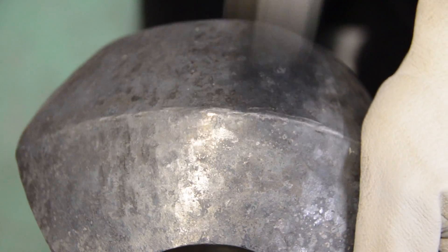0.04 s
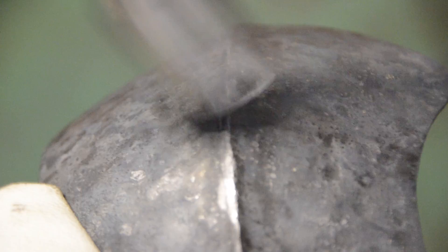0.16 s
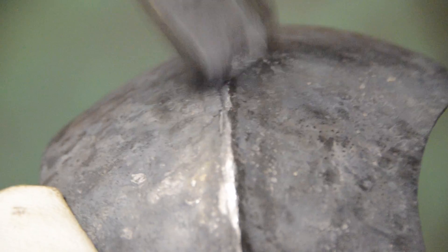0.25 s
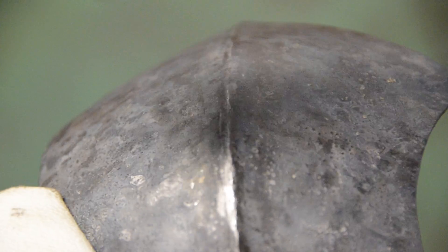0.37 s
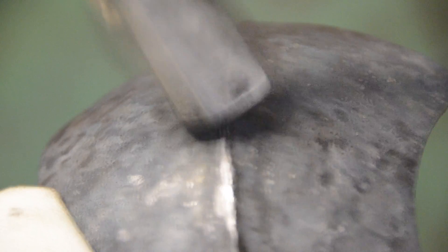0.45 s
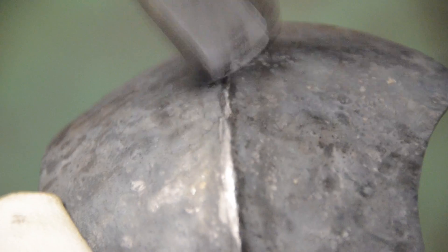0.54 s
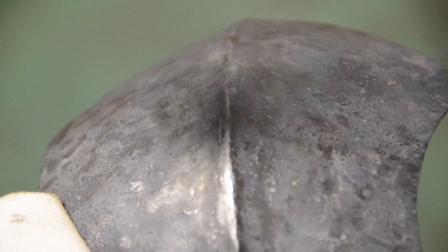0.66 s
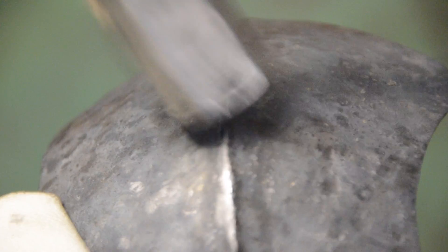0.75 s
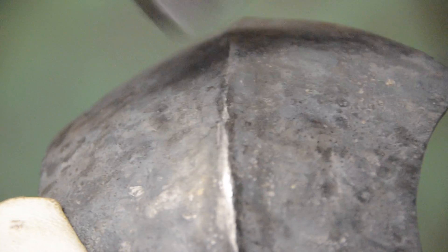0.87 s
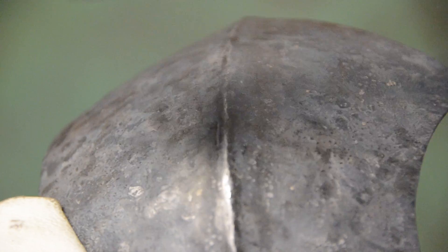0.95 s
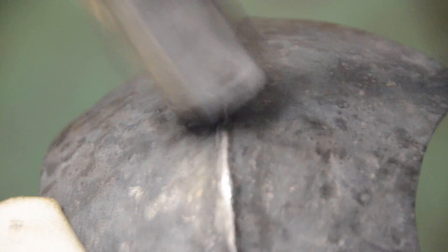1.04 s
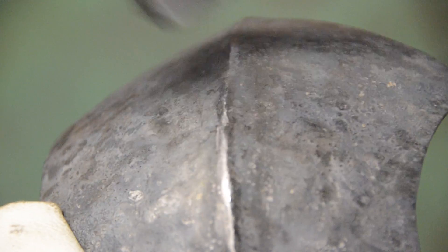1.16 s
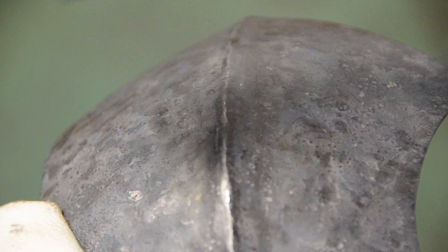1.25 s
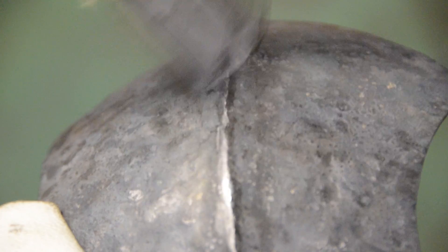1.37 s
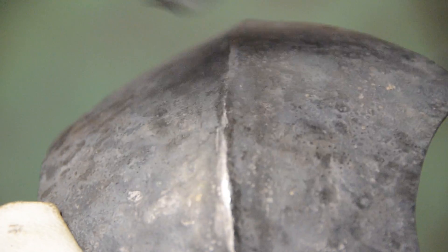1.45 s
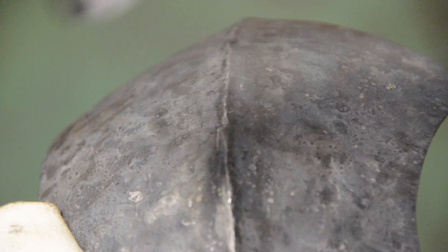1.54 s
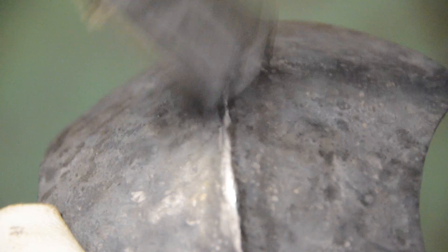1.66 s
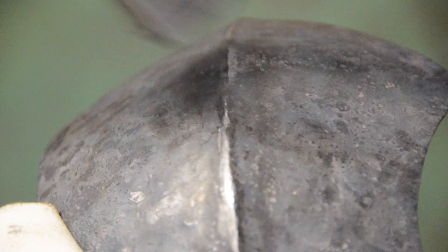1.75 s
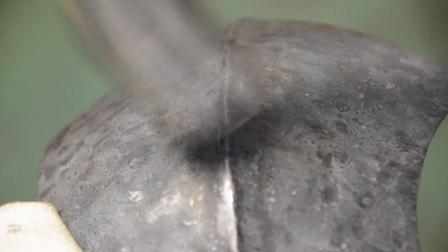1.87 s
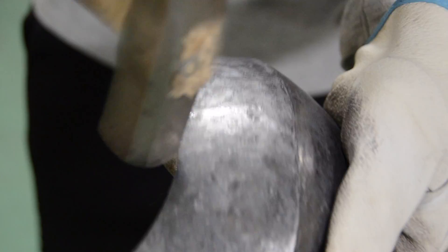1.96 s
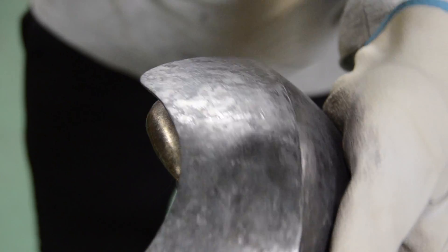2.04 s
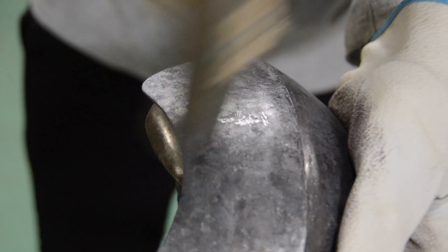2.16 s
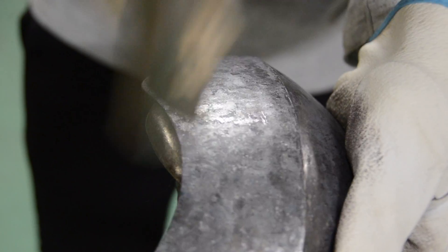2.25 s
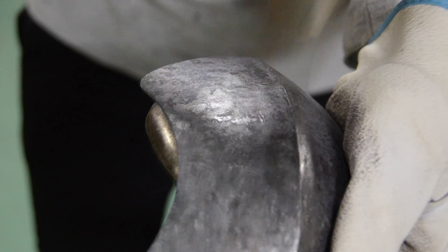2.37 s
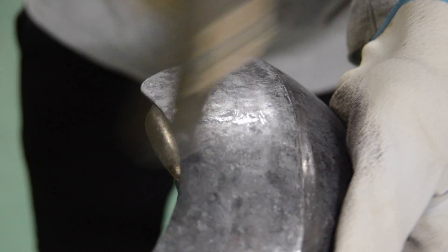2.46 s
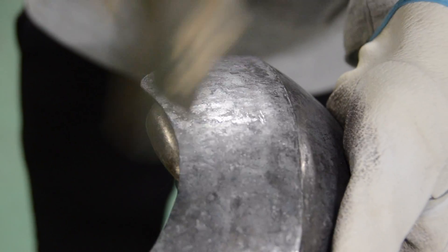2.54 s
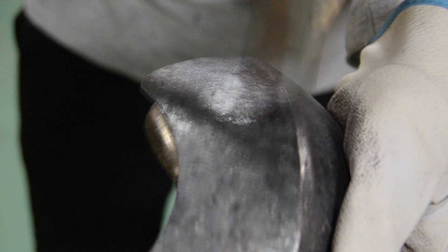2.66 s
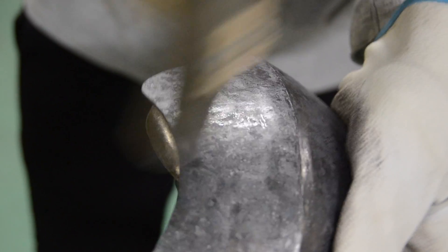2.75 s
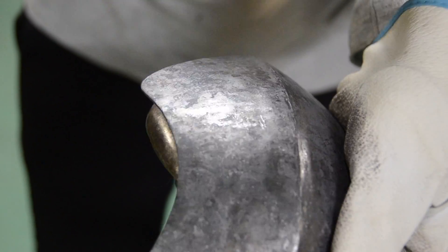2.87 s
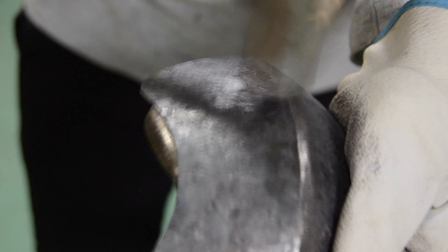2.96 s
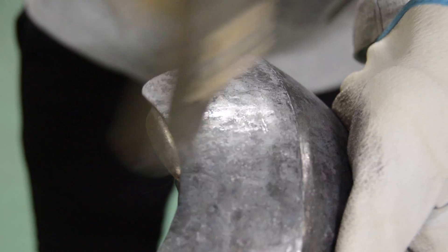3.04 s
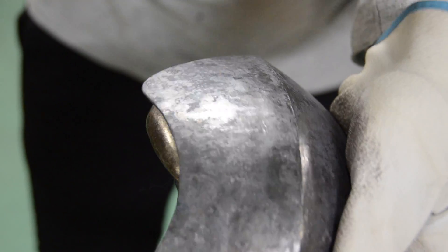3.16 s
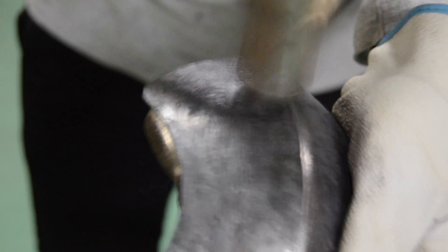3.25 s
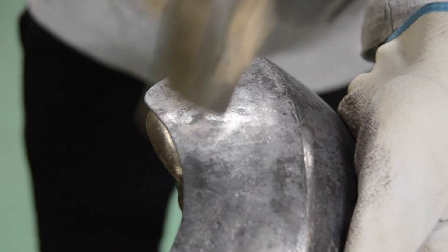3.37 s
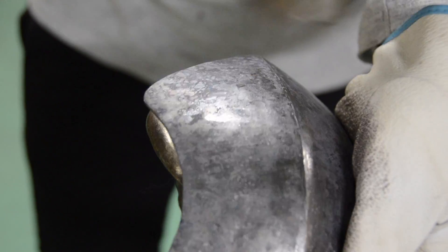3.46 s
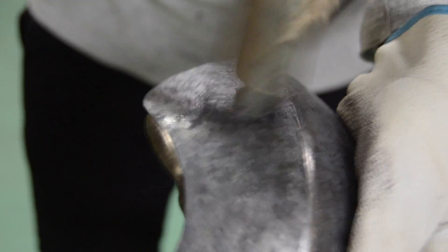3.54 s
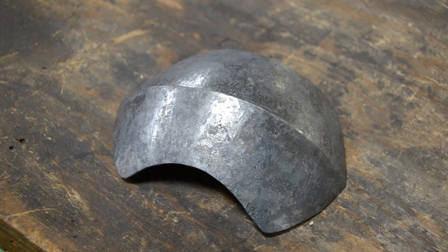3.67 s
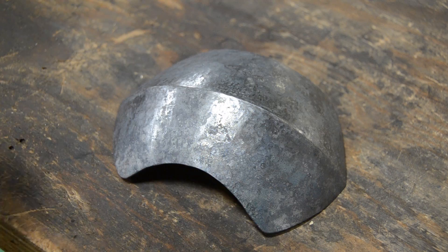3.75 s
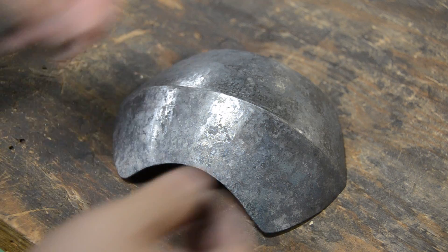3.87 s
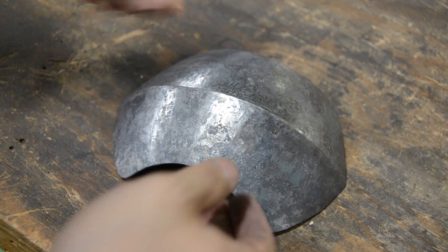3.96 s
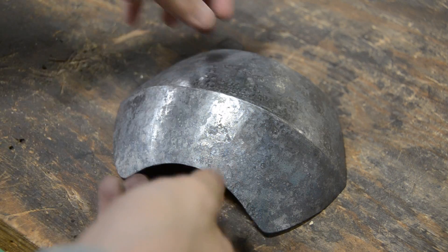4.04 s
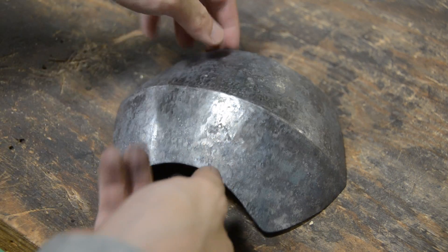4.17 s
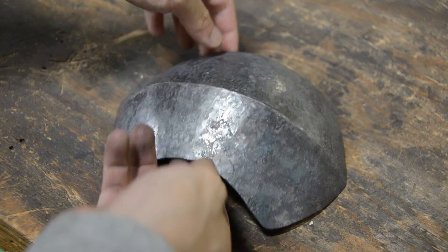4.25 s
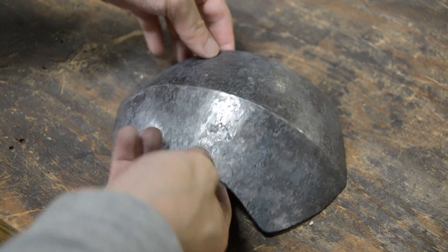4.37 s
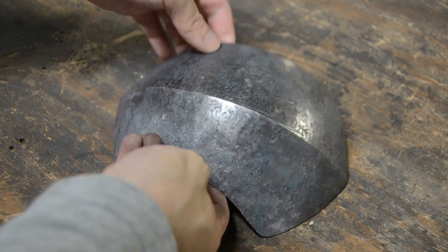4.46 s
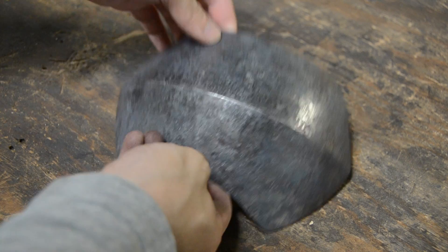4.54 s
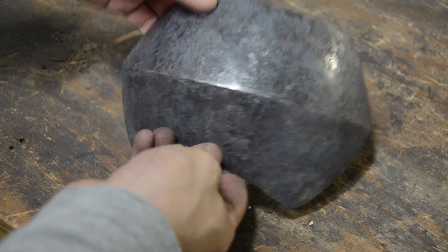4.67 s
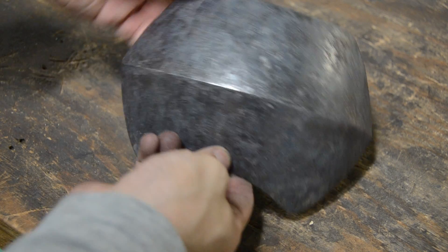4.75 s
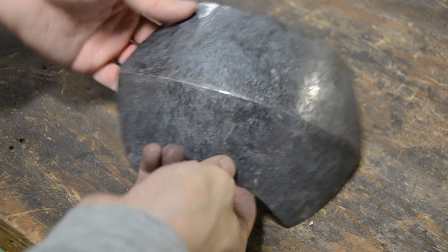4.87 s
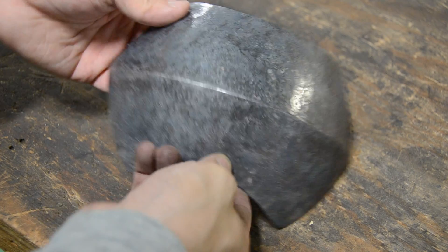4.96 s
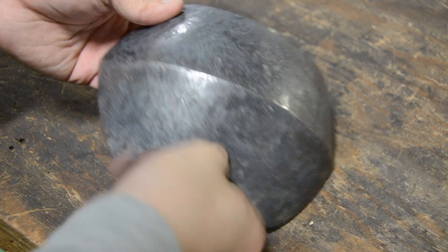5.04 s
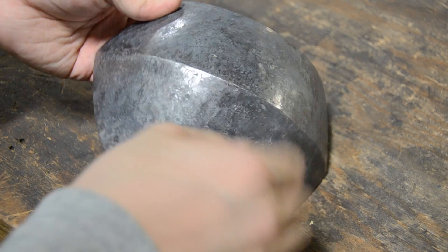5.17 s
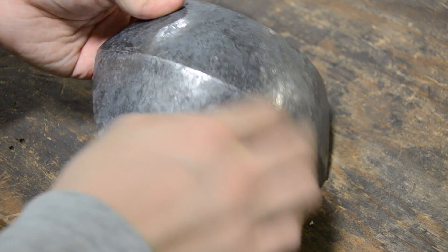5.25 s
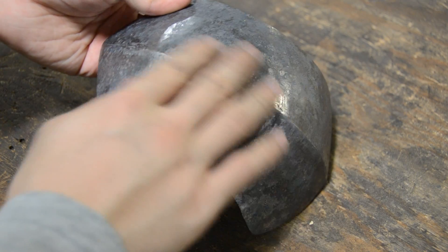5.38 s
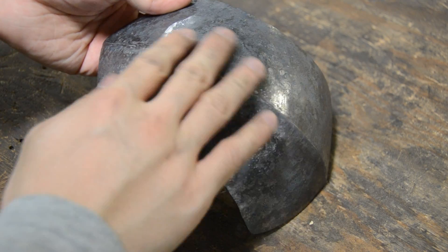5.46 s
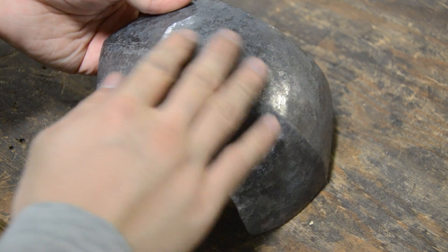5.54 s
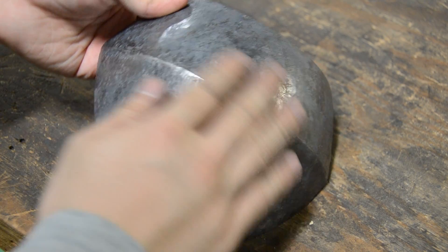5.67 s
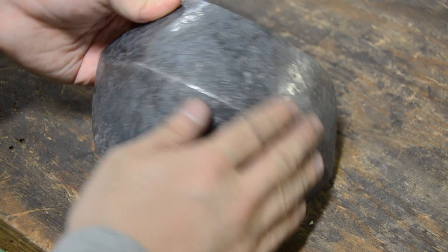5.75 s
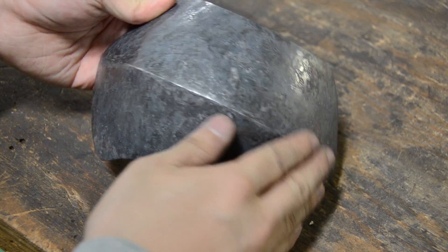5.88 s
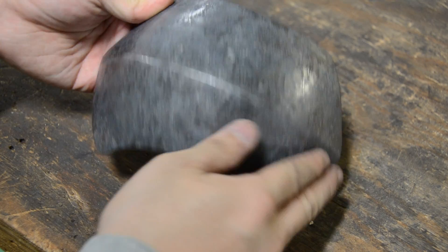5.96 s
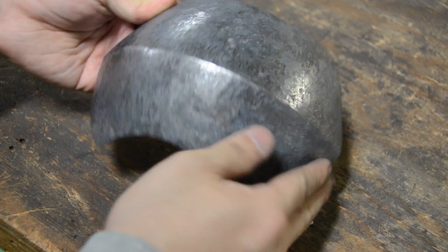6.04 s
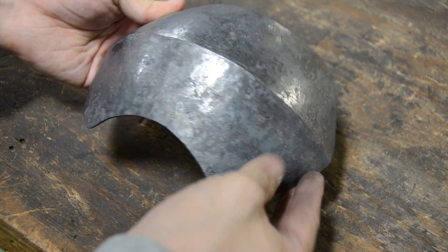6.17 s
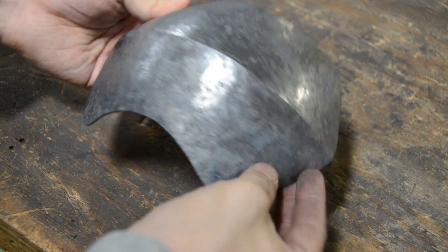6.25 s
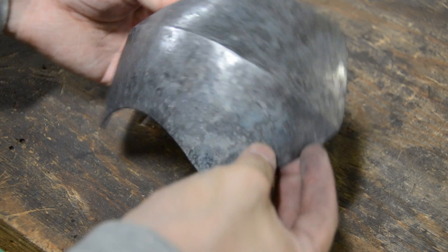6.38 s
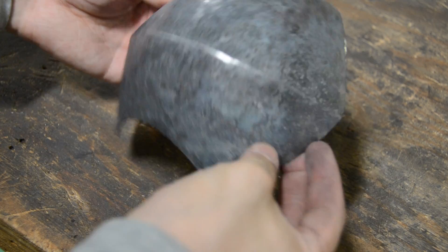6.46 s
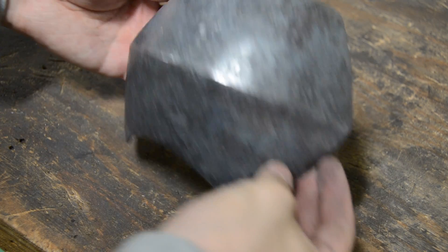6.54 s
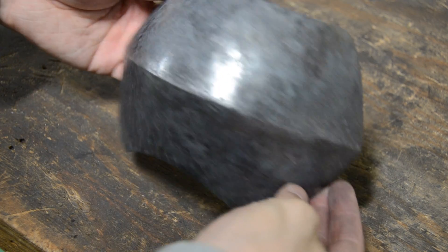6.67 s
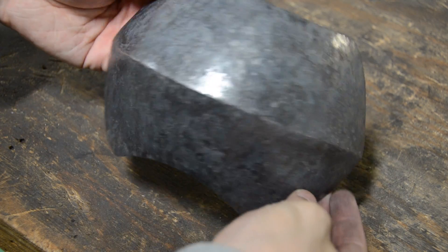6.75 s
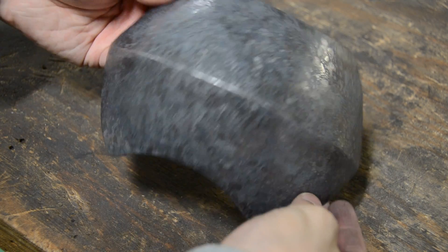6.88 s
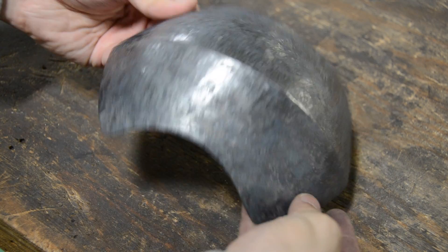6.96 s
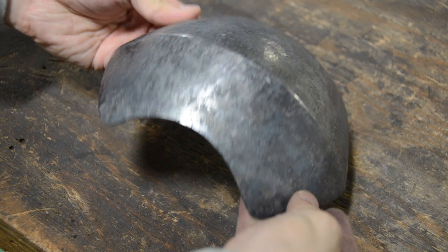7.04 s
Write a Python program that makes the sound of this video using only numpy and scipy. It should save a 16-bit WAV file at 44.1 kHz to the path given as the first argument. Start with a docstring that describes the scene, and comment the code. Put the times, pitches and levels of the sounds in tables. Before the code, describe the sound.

Loud, clipped metallic hammer blows ring at a steady pace through a workshop, cutting abruptly to soft hand rubbing and small knocks on wood.

```python
"""An echoing workshop: a hand hammer planishes a domed steel plate over a stake, in three passages cut hard together.
Each blow is contact noise plus decaying plate modes, with near echoes and a diffuse room tail.
The camera's gain ducks a few ms after each loud peak, its input clips, and the gain climbs back.
A fourth, quiet passage has bare hands lifting the plate off a wooden bench and stroking it: swelling
noise hisses and feeds the plate's modes, while drags and knocks drive bench resonances over faint air."""
import sys
import numpy as np
from scipy import signal
from scipy.fft import rfft, irfft, next_fast_len
from scipy.io import wavfile
from scipy.ndimage import map_coordinates

SR = 44100
rng = np.random.default_rng(int(sys.argv[2]) if len(sys.argv) > 2 else 0)


def file_out(sig):
    """Save sig as 16-bit WAV at sys.argv[1]."""
    # one column per channel
    cols = np.atleast_2d(sig).T
    # limit, then scale
    lim = np.clip(cols, -1, 1)
    pcm = np.round(lim * 32767).astype(np.int16)
    wavfile.write(sys.argv[1], SR, pcm)


def ratio(d):
    """dB to gain"""
    e = np.asarray(d, float) / 20
    return 10 ** e


N = 313551

# Start of each of the four passages. Each row: time in seconds.
PASSAGE_STARTS = [0, .199, 1.951, 3.618]
LEAD_S = .5  # each hammering passage already runs this long before it is heard

# Workshop air and hiss. Each row: frequency in Hz, relative level in dB.
AIR_SPECTRUM = [(15, -25), (30, -11), (70, -5), (125, 0), (300, -1.5), (600, -1.5), (1400, -8), (3000, -13),
                (4600, -16), (7500, -17), (10000, -22), (15500, -36)]
AIR_DB = -65
# Room decay. Each row: frequency in Hz, time to fall 60 dB in seconds.
ROOM_DECAY = [(100, 0.3), (500, 0.47), (1800, 0.51), (4000, 0.53), (8000, 0.41), (13000, 0.32)]
# Echoes off bench and wall. Each row: delay in seconds, level in dB before the passage's own echo level.
NEAR_ECHOES = [(.005, 2.5), (0.0107, 1), (.019, -4.5)]
# Notches of the microphone housing. Each row: frequency in Hz, width in Hz, depth from 0 to 1.
HOUSING_NOTCHES = [(5680, 380, .85), (6890, 80, .85)]

# Wooden bench resonances. Each row: frequency in Hz, width in Hz, relative level in dB.
BENCH_RESONANCES = [(119, 14, 2), (328, 80, -4), (593, 60, 2), (926, 460, -7)]
# Rim and wrists drag on the bench. Each row: start in seconds, length in seconds, crest as share of the
# length, rumble in dB, scrape in dB.
BENCH_DRAGS = [(4.27, .19, .5, -72, -62), (4.47, 0.127, 0.32, -55, -65.5), (4.903, 0.095, 0.14, -50.5, -66),
               (4.98, .12, 0.36, -60, -52), (5.07, 0.178, .3, -58, -63), (5.262, 0.158, .12, -55, -70),
               (5.65, .45, 0.38, -72, -71), (6.3, .22, .55, -79, -69)]
# Rim and nails tap. Each row: time in seconds, relative tick strength in dB, relative knock strength in dB.
TAPS = [(4.1514, -55, -64), (4.4718, -57, -35), (4.506, -55, -61), (4.9088, -45, -43), (4.9444, -50, -60),
        (5.003, -45, -27), (5.0268, -45, -42), (5.0676, -44, -51), (5.1569, -57, -58), (5.2676, -49.5, -45),
        (5.2971, -48.5, -67), (5.6877, -42, -59), (6.156, -48.5, -65.5), (6.3934, -43.5, -54),
        (7.0145, -50.5, -65.5)]
# A sleeve moves. Each row: start in seconds, length in seconds, crest as share of the length, level in dB.
SLEEVE_RUSTLES = [(3.72, .4, .5, -70.5)]
# Colour of the cloth. Each row: frequency in Hz, relative level in dB.
CLOTH_SPECTRUM = [(400, -25), (1200, -4), (2500, -1.5), (5000, -8), (8000, -25.5)]
# Colour of skin on steel, before the plate colours it. Each row: frequency in Hz, relative level in dB.
SKIN_SPECTRUM = [(2060, -46.5), (3500, -22), (4870, -20), (5310, -22.5), (5760, -15), (7250, -4.5),
                 (9600, -1), (13400, -24), (15500, -28)]
# Skin slides on the plate. Each row: start in seconds, length in seconds, crest as share of the length,
# hiss in dB, drive of the ring in dB.
SKIN_STROKES = [(4.145, .08, .2, -71, -54), (4.21, .2, 0.6, -64.5, -43.5), (4.415, .14, .15, -72, -51),
                (4.658, .05, .4, -58, -50), (4.71, 0.054, .5, -59, -45.5), (4.865, 0.073, 0.64, -66, -43),
                (4.94, .18, 0.58, -61, -36.5), (5.11, 0.081, .7, -69, -50), (5.262, .24, .52, -55, -58),
                (5.49, .43, .44, -51.5, -49), (5.85, .198, .78, -55, -40), (6.03, .1, .3, -76, -56),
                (6.14, 0.087, .45, -67, -41), (6.22, .09, .5, -70, -43.5), (6.345, .16, .45, -65, -44),
                (6.55, .16, .6, -72, -50.5), (6.69, .19, .3, -72, -54), (6.89, .085, .55, -73, -50),
                (7.005, .03, .3, -66, -50), (7.045, .14, 0.48, -67, -56)]
# Modes of the plate held loose. Each row: frequency in Hz.
LOOSE_MODES_HZ = [2970, 4560, 5210, 6090, 6780, 7300, 7790, 8320, 8656, 9450, 10590, 11050, 12316]
# The same modes' resonance. Each row: width in Hz, relative level in dB.
LOOSE_MODES_RING = [(40.2, -10), (40.2, -2.5), (50, -4), (35, 2.5), (25, 1), (60.4, -4), (50, -6.5),
                    (50, -5), (40, -1.5), (60, -9), (60, -12), (50, -19), (50.4, -21)]
STROKE_SHAPE, DRAG_SHAPE = 1.3, 1.3  # pointedness of the swells (exponent)

# Colour of the clack in the first passage, before tilt. Each row: frequency in Hz, relative level in dB.
FIRST_CLACK = [(40, -31), (300, -24), (900, -5), (1800, 3), (2700, -7.5), (3200, -20), (4200, -19),
               (5500, -25), (8000, -14), (10500, -20.5), (13000, -35), (16000, -44)]
# The same on the ridge. Each row: frequency in Hz, relative level in dB.
RIDGE_CLACK = [(40, -26.5), (300, -14.5), (900, 1.5), (1800, 3.5), (2700, -1), (3200, -11.5), (4200, -11),
               (5500, -20), (8000, -12), (10500, -18.5), (13000, -34), (16000, -46.5)]
# The same on the edge. Each row: frequency in Hz, relative level in dB.
EDGE_CLACK = [(40, -29), (300, -15), (900, -7), (1800, 2), (2700, -6), (3200, -16), (4200, -7.5),
              (5500, -19.5), (8300, -1.5), (10500, -11), (13000, -22), (16000, -40)]
# Plate and stake, gripped for the ridge. Each row: mode frequency in Hz, time to fall 60 dB in seconds.
RIDGE_MODES = [(904, .1), (2540, .095), (4026, .06), (5318, .05), (6223, .06), (6653, .05), (7213, .05),
               (8656, .05), (9345, .05), (9862, .05), (11132, .04), (12790, .04)]
# Strength of those modes before tilt. Each row: relative level in dB.
RIDGE_MODES_DB = [-17, -4, -18, -21.5, -18, -22, -20, -20, -21.5, -23, -27, -34]
# Plate and stake, gripped for the edge. Each row: mode frequency in Hz, time to fall 60 dB in seconds.
EDGE_MODES = [(1787, .05), (2282, .06), (3748, .09), (4040, .055), (5275, .04), (6158, .05), (6718, .05),
              (7108, .05), (7740, .06), (8520, .06), (9304, .09), (10056, .05)]
# Strength of those modes before tilt. Each row: relative level in dB.
EDGE_MODES_DB = [-18, -14.5, -11, -5.5, -15, -11, -14, -8, -12, -8.5, -10.5, -15.5]
# The stake's stand thrums, ridge. Each row: frequency in Hz, level in dB re the clack, 60 dB fall in seconds.
RIDGE_STAND = [(62, -47, .9), (120, -41.5, .4)]
# The stand, edge. Each row: frequency in Hz, level in dB re the clack, 60 dB fall in seconds.
EDGE_STAND = [(52, -56, .9), (120, -50, .6), (190, -46, .45)]
# Hammer blows. Each row: passage, time in seconds, clack in dB, ring in dB, both ahead of the camera.
HAMMER_BLOWS = [("first", -.17, 0.5, -16), ("first", .1088, 15, -17.5), ("ridge", .1995, 14.5, 4),
                ("ridge", .4819, 15, 1.5), ("ridge", .7727, 10.5, 0.5), ("ridge", 1.0621, 9.5, -9.5),
                ("ridge", 1.3464, 13, 1.8), ("ridge", 1.6373, 8.5, -2.5), ("ridge", 1.9166, 14.5, 0.5),
                ("edge", 1.84, 11.5, 8), ("edge", 2.1242, 10, 5), ("edge", 2.411, 11, 7),
                ("edge", 2.6909, 11, 7), ("edge", 2.9787, 11, 7), ("edge", 3.2616, 11, 7),
                ("edge", 3.5385, 11, 7)]
# The plate jumps and falls back on the stake. Each row: passage, time in seconds, clack in dB, ring in dB,
# both ahead of the camera.
PLATE_REBOUNDS = [("ridge", 0.23, -6, 2.5), ("ridge", .517, 0, 7.2), ("ridge", .822, -3, 3.7),
                  ("ridge", 1.116, -6, -9), ("ridge", 1.388, -3.5, 7), ("ridge", 1.682, -4, -9.5),
                  ("edge", 1.87, 15, -9), ("edge", 2.1456, 14, -8.5), ("edge", 2.179, -1.5, -12),
                  ("edge", 2.44, 14.5, -9), ("edge", 2.7223, 17.5, -9), ("edge", 3.0092, 17.5, -9),
                  ("edge", 3.291, 14.5, -9), ("edge", 3.571, 13.5, -9)]
# Brightness in each passage. Each row: tilt of a blow and tilt of a rebound, in dB per octave.
BRIGHTNESS = {"first": (.6, .6), "ridge": (1.5, -2.8), "edge": (1.4, -1.3)}
# A rebound reaches the room less than a blow, and its contact lasts this share.
REBOUND_DRIER_DB, REBOUND_SHARE = 6, .55

# Camera: climb of the gain in dB per second, share of the excess that is ducked, bass roll-off in Hz.
RELEASE_DB_PER_S, DUCK_SLOPE, LOW_CUT_HZ = 68, .9, 90
OVERLOAD = 1.1  # the input stage clips at this amplitude


def unit(x):
    """Scaled to rms 1."""
    return x / np.sqrt(np.mean(x ** 2) + 1e-20)


def along(points, hz):
    """Points of (Hz, value) read on a log frequency axis."""
    f, v = np.transpose(points)
    return np.interp(np.log(hz + 1), np.log(f + 1), v)


def filtered(x, response):
    """Passes x through a response given as a function of frequency."""
    size = next_fast_len(len(x) + 8192)
    return irfft(rfft(x, size) * response(np.fft.rfftfreq(size, 1 / SR)), size)[:len(x)]


def resonance(f, centre, width):
    """Band-pass response of one damped oscillator, 1 at its centre."""
    return 1j * f * width / (centre * centre - f * f + 1j * f * width)


def resonances(peaks):
    """Causal response of (Hz, width, dB) resonances, summed with alternating sign."""
    def response(f):
        return sum((-1) ** k * ratio(db) * resonance(f, centre, width)
                   for k, (centre, width, db) in enumerate(peaks))
    return response


def noise(size, spectrum):
    """Coloured noise of rms 1."""
    return unit(filtered(rng.standard_normal(size), lambda hz: ratio(along(spectrum, hz))))


def workshop_air():
    """Steady coloured noise for the workshop air and hiss."""
    return ratio(AIR_DB) * noise(N, AIR_SPECTRUM)


def room_tail():
    """A fresh diffuse tail of energy 1, each frequency dying at its own speed."""
    hz, t, z = signal.stft(rng.standard_normal(SR), SR, nperseg=256)
    decay = ratio(-60 * t / along(ROOM_DECAY, hz)[:, None])
    tail = signal.istft(z * decay, SR, nperseg=256)[1][:SR]
    # echoes thicken over the first moments
    tail = tail * (1 - np.exp(-np.arange(len(tail)) / SR / .028))
    return tail / np.linalg.norm(tail)


def microphone(x):
    """The housing cuts two narrow notches, each a resonance taken away from the direct sound."""
    def response(f):
        return np.prod([1 - depth * resonance(f, centre, width) for centre, width, depth in HOUSING_NOTCHES], 0)
    return filtered(x, response)


def gain_control(x, threshold_db, slope, release_db, attack):
    """Ducks a few ms after a loud peak, then climbs back at a steady number of dB a second."""
    def late(v):
        rate = 1 / (attack * SR)
        return signal.lfilter([rate], [1, rate - 1], v)
    level_db = 10 * np.log10(late(x ** 2) + 1e-12)
    need_db = slope * np.maximum(level_db - threshold_db, 0)
    climb_db = release_db * np.arange(len(x)) / SR
    duck_db = np.maximum.accumulate(need_db + climb_db) - climb_db
    return x * ratio(-late(duck_db))


def swells(rows, shape):
    """Each slide swells to its crest and fades; one gain curve for each dB column."""
    t = np.arange(N) / SR
    gains = 0
    for start, length, crest, *levels_db in rows:
        peak = np.clip(crest, .05, .95)
        phase = np.interp(t, [start, start + peak * length, start + length], [0, np.pi / 2, np.pi])
        gains = gains + ratio(np.array(levels_db))[:, None] * abs(np.sin(phase)) ** shape
    return gains


def grain(size_db):
    """Uneven stick and slip: noise whose grains vary in size, at rms 1."""
    sizes = ratio(size_db * rng.exponential(size=N))
    return unit(sizes * rng.standard_normal(N))


def loose_plate():
    """Response of the plate held loose in the hands, a sum of its modes."""
    return resonances([(hz, *mode) for hz, mode in zip(LOOSE_MODES_HZ, LOOSE_MODES_RING)])


def sleeve():
    """Cloth rubs as a sleeve moves: a soft swell of coloured noise."""
    return swells(SLEEVE_RUSTLES, STROKE_SHAPE)[0] * noise(N, CLOTH_SPECTRUM)


def bench_drags():
    """Rubbing on the bench: low modes rumble, upper ones scrape with stick and slip."""
    rumble_gain, scrape_gain = swells(BENCH_DRAGS, DRAG_SHAPE)
    low, broad = resonances(BENCH_RESONANCES[:2]), resonances([(125, 160, 0)])
    rumble = unit(filtered(rng.standard_normal(N), lambda hz: low(hz) * broad(hz)))
    scrape = unit(filtered(grain(1.8), resonances(BENCH_RESONANCES[1:])))
    return rumble_gain * rumble + scrape_gain * scrape


def taps():
    """Impulses tick on the plate and softer pulses knock the bench, with a little room."""
    ticks, knocks = np.zeros((2, N))
    for at, tick_db, knock_db in TAPS:
        ticks[round(at * SR)] = ratio(tick_db)
        knocks[round(at * SR)] = ratio(knock_db)
    knocks = np.convolve(knocks, np.hanning(26) / 12)[:N]  # soft contact, half a millisecond long
    plate = loose_plate()
    tick = filtered(ticks, lambda hz: ratio(along(SKIN_SPECTRUM, hz) / 2) + 25 * plate(hz))
    knock = filtered(knocks, resonances(BENCH_RESONANCES))
    near = ratio(6) * tick + ratio(36) * knock
    return near + ratio(-17) * signal.fftconvolve(near, room_tail())[:N]


def squeaks(push, shift_db, rate):
    """The fingers move over the plate, so each mode is fed now strongly, now weakly."""
    out = np.zeros(N)
    for hz, (width_hz, db) in zip(LOOSE_MODES_HZ, LOOSE_MODES_RING):
        points = rng.standard_normal(round(N * rate / SR) + 4)
        wander = map_coordinates(points, [np.arange(N) * rate / SR])
        mode = signal.iirpeak(hz, hz / width_hz, SR)
        out += ratio(db) * signal.lfilter(*mode, push * ratio(shift_db * wander))
    return out


def skin_strokes():
    """Skin hisses on the steel by friction and sets the plate's modes ringing."""
    hiss_gain, ring_gain = swells(SKIN_STROKES, STROKE_SHAPE)
    plate = loose_plate()
    hiss = unit(filtered(grain(1.2), lambda hz: ratio(along(SKIN_SPECTRUM, hz)) * (1 + 1.9 * abs(plate(hz)))))
    return hiss_gain * hiss + squeaks(ring_gain * grain(2), shift_db=3.5, rate=9)  # rate in Hz


def handling():
    """The quiet passage: air, sleeve, bench, taps and strokes through the microphone housing."""
    return microphone(workshop_air() + sleeve() + bench_drags() + taps() + skin_strokes())


def ringing(modes, db, t, spread_db, split):
    """Each mode is a close cluster of three that beats, at a new strength each blow."""
    def side_tone(hz):
        return np.sin(2 * np.pi * hz * (1 + split * rng.standard_normal()) * t)
    out = 0
    for hz, level_db, t60 in modes:
        cluster = .8 * np.sin(2 * np.pi * hz * t) + .45 * (side_tone(hz) + side_tone(hz))
        out = out + ratio(db + level_db + rng.normal(0, spread_db) - 60 * t / t60) * cluster
    return out


def blow(clack_db, ring_db, tilt_db, colour, modes, levels, stand, clack_t60, echo_db, wet_db):
    """A burst of contact noise and the plate's modes, direct, off near surfaces and through the room."""
    t = np.arange(SR // 2) / SR

    def tilt(hz):
        return tilt_db * np.log2(hz / 2000)

    tilted = [(hz, db + tilt(hz)) for hz, db in colour]
    tilted_modes = [(hz, db + tilt(hz), t60) for (hz, t60), db in zip(modes, levels)]
    fade = ratio(clack_db - 60 * t / clack_t60)
    clack = fade * noise(len(t), tilted)
    ring = ringing(tilted_modes, ring_db, t, spread_db=2.5, split=0.0055)
    thrum = ringing(stand, clack_db, t, spread_db=3.0, split=0.049)
    near = clack + ring + thrum
    for delay, db in NEAR_ECHOES:  # each echo also repeats the ones before it
        near = near + ratio(db + echo_db) * np.pad(near, (round(delay * SR), 0))[:len(t)]
    tail = room_tail()
    # heard from all sides at once, the clack keeps its energy and its even colour
    clack_tail = filtered(tail, lambda hz: ratio(along(tilted, hz)))
    clack_tail = clack_tail * np.linalg.norm(fade) / np.linalg.norm(clack_tail)
    ring_tail = signal.fftconvolve(ring, tail)[:len(tail)]
    return np.pad(near, (0, len(tail) - len(t))) + ratio(wet_db) * (clack_tail + ring_tail)


def hammering(name, threshold_db, *plate, wet_db, clack_t60, echo_db):
    """One passage of blows and rebounds: housing, late ducking, clipped input and bass roll-off."""
    lead = round(LEAD_S * SR)
    x = np.zeros(lead + N)
    kinds = (HAMMER_BLOWS, 0, 1), (PLATE_REBOUNDS, REBOUND_DRIER_DB, REBOUND_SHARE)
    for (table, drier_db, share), tilt_db in zip(kinds, BRIGHTNESS[name]):
        for passage, at, clack_db, ring_db in table:
            if passage != name:
                continue
            sound = blow(clack_db, ring_db, tilt_db, *plate, clack_t60 * share, echo_db, wet_db - drier_db)
            x[lead + round(at * SR):][:len(sound)] += sound
    ducked = gain_control(microphone(x), threshold_db, DUCK_SLOPE, RELEASE_DB_PER_S, attack=.0025)
    clipped = np.clip(ducked, -OVERLOAD, OVERLOAD)
    return signal.lfilter(*signal.butter(1, LOW_CUT_HZ, "high", fs=SR), clipped)[lead:]


def scene():
    """The four passages joined by hard cuts."""
    ridge = RIDGE_MODES, RIDGE_MODES_DB, RIDGE_STAND
    edge = EDGE_MODES, EDGE_MODES_DB, EDGE_STAND
    passages = [
        hammering("first", -11, FIRST_CLACK, *ridge, clack_t60=0.034, echo_db=-2.0, wet_db=11),
        hammering("ridge", -10, RIDGE_CLACK, *ridge, clack_t60=0.031, echo_db=-3.0, wet_db=3.5),
        hammering("edge", -9.0, EDGE_CLACK, *edge, clack_t60=.026, echo_db=-8, wet_db=.8),
        handling()]
    playing = np.searchsorted(PASSAGE_STARTS, np.arange(N) / SR, side="right") - 1
    return np.choose(playing, passages)[None]


def low_pass(x):
    """Removes everything above the highest recorded frequency."""
    return signal.sosfilt(signal.butter(12, 16050, fs=SR, output="sos"), x)


def record(dry):
    """The converter clips at full scale."""
    mix = np.clip(dry, -1, 1)
    return low_pass(mix)


dry = scene()
out = record(dry)
file_out(out)
```